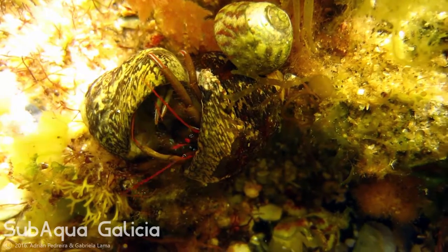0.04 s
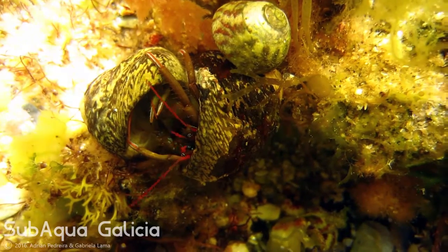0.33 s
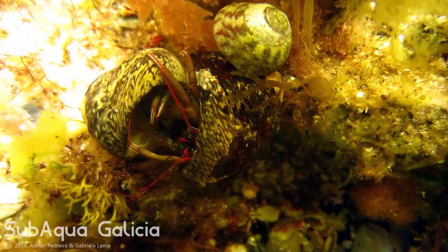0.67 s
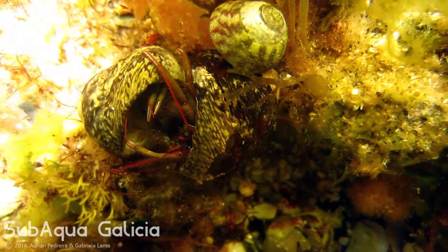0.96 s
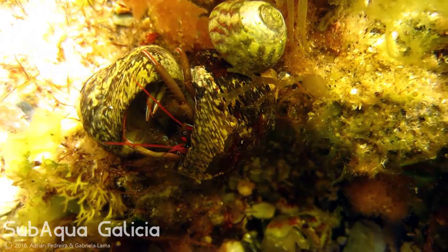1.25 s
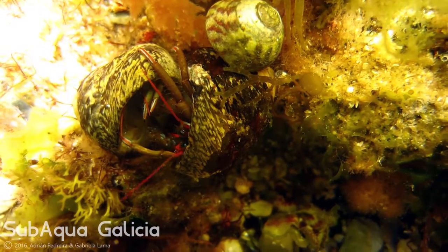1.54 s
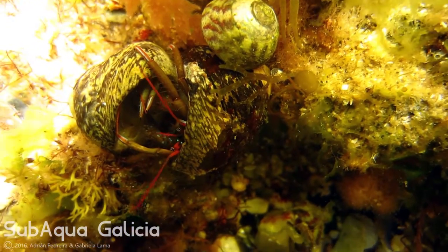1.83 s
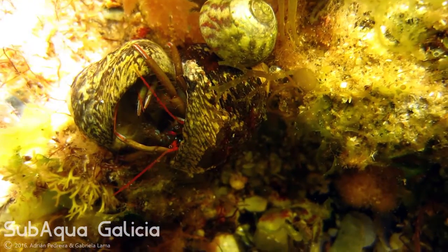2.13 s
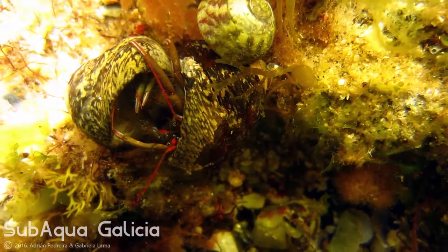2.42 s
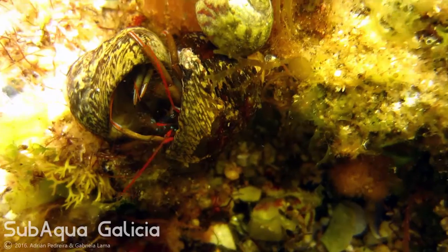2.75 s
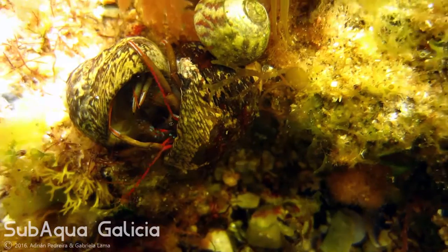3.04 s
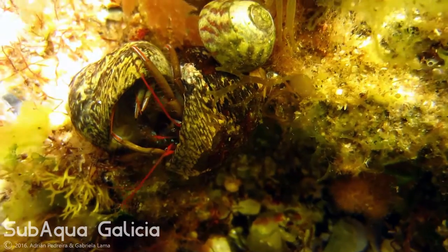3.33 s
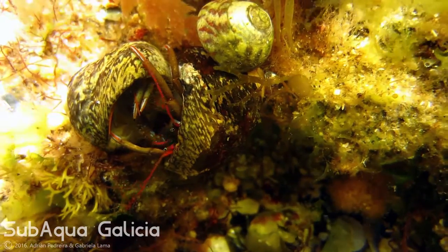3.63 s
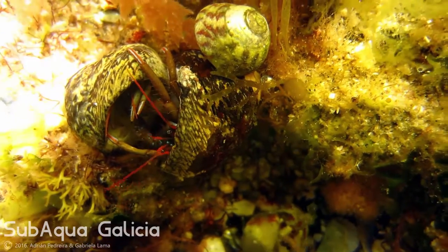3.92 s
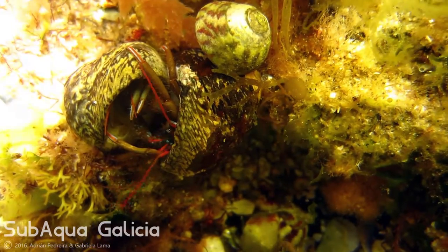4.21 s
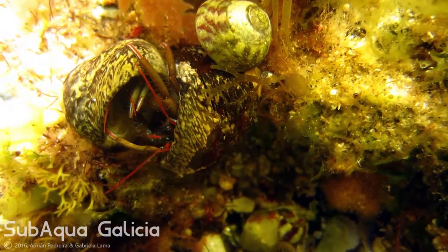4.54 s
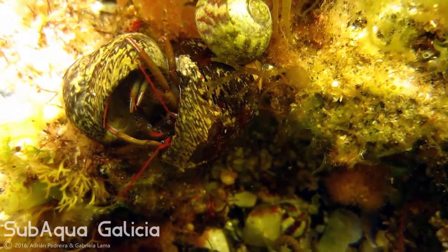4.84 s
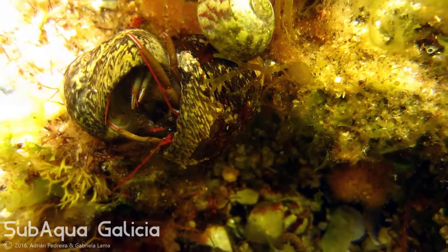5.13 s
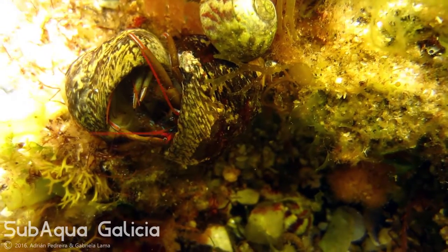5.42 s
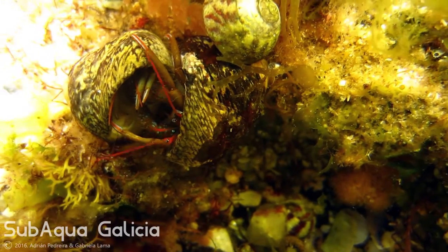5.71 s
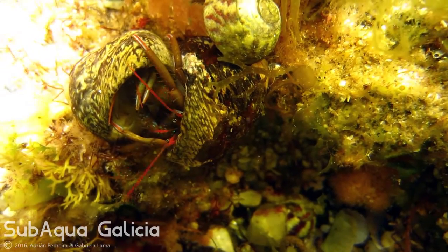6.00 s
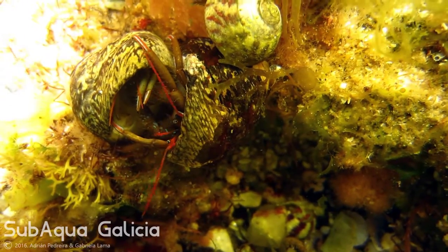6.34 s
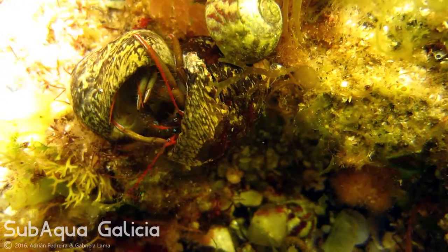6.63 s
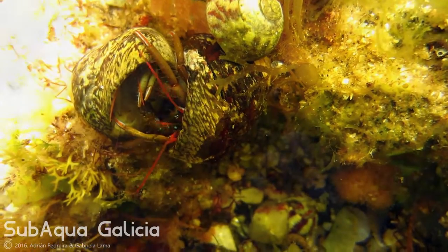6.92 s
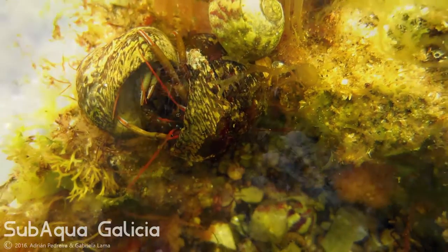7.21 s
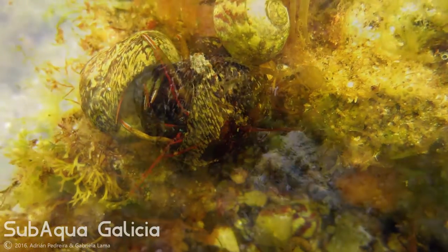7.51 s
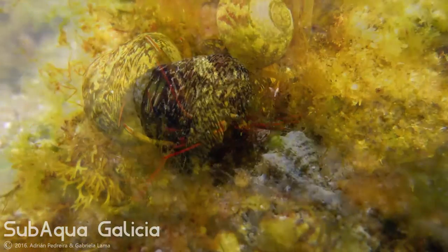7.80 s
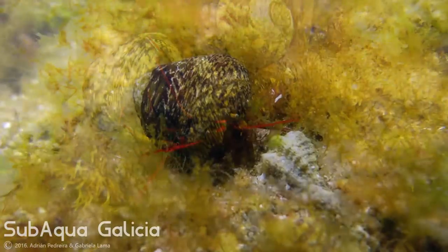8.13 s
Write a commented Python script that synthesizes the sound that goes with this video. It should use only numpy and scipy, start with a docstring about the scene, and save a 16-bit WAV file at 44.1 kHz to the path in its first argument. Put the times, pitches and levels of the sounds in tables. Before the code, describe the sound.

A quiet, hollow hum with a thin wavering whine and a low rumble runs under water, heard from inside a camera housing. Faint dull bumps dot the first two seconds. At about 2.7 seconds a heavy knock hits the housing, the loudest moment, with scratchy rubbing and a scatter of tiny sharp clicks until 3.3 seconds. A short wash of water passes at around 3 seconds. Soft bumps continue, and from 5 to 6 seconds water swells gently with small gurgles, followed by a few light taps. At 7.1 seconds comes a second sharp knock with clicks, then rubbing, a tiny squeak, smaller bumps and more washing. The sound drops out at 7.6 seconds and returns at about 7.75 with a brighter, fizzing wash, a gurgle sinking in pitch and two faint clicks, ending near 8.3 seconds.

```python
"""Underwater camera beside a hermit crab

The camera's noise and thin whine resonate in the air of its watertight housing on the sea floor.
A hand knocks on the wall and rubs it, small clicks ring, and water gurgles and washes past.
Near the end the sound drops out for a moment at a change of shot and returns with a brighter wash."""
import sys
import numpy as np
from scipy import signal
from scipy.fft import rfft, irfft
from scipy.io import wavfile
from scipy.ndimage import uniform_filter1d

SR = 44100
rng = np.random.default_rng(int(sys.argv[2]) if len(sys.argv) > 2 else 0)


def generate_wav(signal):
    """Clip the signal to [-1, 1] and save it as 16-bit WAV at the path in sys.argv[1]."""
    frames = np.transpose(np.atleast_2d(signal))
    scaled = np.clip(frames, -1, 1) * 32767
    pcm = np.round(scaled).astype(np.int16)
    wavfile.write(sys.argv[1], SR, pcm)


N = 364266
TIME_S, BIN_HZ = np.arange(N) / SR, np.fft.rfftfreq(N, 1 / SR)
SHOT_END_S, SHOT_START_S = 7.588, 7.754   # the first shot ends, the second starts

# Small sharp clicks. Each row: start in seconds, level in dB, pitch of the ring in Hz.
CLICKS = [(2.244, -54, 4780), (2.6705, -48, 6000), (2.681, -47, 7000), (2.7422, -40, 2880),
          (2.778, -53, 5500), (2.7895, -58, 6500), (2.797, -47, 4800), (2.805, -54, 5200),
          (2.826, -46, 4600), (2.835, -60, 7050), (2.917, -49.5, 7000), (2.941, -57, 3300),
          (2.992, -53, 5500), (3.111, -53, 5500), (3.198, -56, 3500), (3.204, -55, 5500),
          (3.2634, -52, 7000), (3.284, -55.5, 7000), (3.292, -53, 6000), (3.307, -43.5, 6000),
          (3.333, -40.5, 5800), (7.08, -50, 3460), (7.083, -37.5, 7000), (7.0955, -38.5, 3280),
          (8.125, -50, 4790), (8.2073, -46, 4700)]


def from_db(db):
    """Amplitude grows tenfold with every 20 dB."""
    return 10 ** (np.asarray(db) / 20)


def rms_one(x):
    """Normalisation to an rms of 1."""
    return x / np.sqrt(np.mean(x ** 2) + 1e-20)


def per_bin(points):
    """Interpolation of (Hz, value) points at every bin, along a logarithmic frequency axis."""
    hz, value = np.transpose(points)
    return np.interp(np.log(BIN_HZ + 1e-6), np.log(hz), value)


def panned(pan_db):
    """Level difference, left minus right, as a gain for each microphone."""
    return from_db(np.array([[pan_db], [-pan_db]]) / 2)


def pair(two, correlation):
    """Sum and difference of two independent signals give a left and a right of set correlation."""
    alike = np.clip(correlation, -.98, .98)
    return np.sqrt(1 + alike) * two[0] + np.sqrt(1 - alike) * two[1] * np.array([[1], [-1]])


def drift(rate_hz):
    """Low-passed noise wanders at random; rms 1."""
    return rms_one(irfft(rfft(rng.standard_normal(N)) / (1 + (BIN_HZ / rate_hz) ** 2), N))


def wavering(hz, width_hz):
    """A randomly driven resonance gives narrow-band noise about a steady or moving pitch."""
    phase = 2 * np.pi * np.cumsum(hz * np.ones(N)) / SR
    return drift(width_hz) * np.cos(phase) + drift(width_hz) * np.sin(phase)


def grains(spectrum, per_s, spread_db, correlation):
    """Shot noise: tiny random impulses of uneven size, filtered by their path; rms 1."""
    sizes = from_db(spread_db * np.minimum(rng.exponential(1, (2, N)), 4))
    impulses = (rng.random((2, N)) < per_s / SR) * sizes * rng.choice([-1, 1], (2, N))
    return rms_one(irfft(pair(rfft(impulses), correlation) * from_db(per_bin(spectrum)), N))


def swells(rows, rise_share):
    """Amplitude envelope of movements that speed up and slow down in a cosine arch."""
    envelope = np.zeros(N)
    for peak_s, length_s, level_db in rows:
        side_s = length_s * np.where(TIME_S < peak_s, rise_share, 1 - rise_share)
        envelope += from_db(level_db) * np.cos(np.pi / 2 * np.clip((TIME_S - peak_s) / side_s, -1, 1))
    return envelope


def ring(force, modes):
    """Modal superposition: each mode answers a force as a damped oscillator."""
    out = np.zeros((2, N))
    for hz, level_db, t60, pan_db in modes:
        radius, angle = from_db(-60 / (t60 * SR)), 2 * np.pi * hz / SR
        swing = signal.lfilter([.5, 0, -.5], [1, -2 * radius * np.cos(angle), radius ** 2], force + 1e-18)
        out += from_db(level_db) * panned(pan_db) * swing
    return out


def hum(level_db=-48):
    """Cavity resonance: the air in the housing lifts bands of the camera's steady noise."""
    # Noise spectrum at each microphone. Each row: frequency in Hz, relative level in dB.
    left_spectrum = [(20, -20.5), (45, -12), (130, -0.5), (400, -6.5), (600, -8), (880, -6.5), (1050, -7),
                     (1550, -14.5), (2100, -14.5), (3200, -25.5), (4500, -30), (7000, -32), (10500, -40.5),
                     (12500, -67), (14300, -41.5)]
    right_spectrum = [(20, -16), (45, -6), (130, -1.5), (400, -6.5), (600, -7), (840, -1), (960, -10.5),
                      (1550, -14), (2200, -18), (3200, -23), (4500, -30), (7000, -31.5), (10500, -40.5),
                      (12500, -65.5), (14300, -41.5)]
    # Air resonances. Each row: centre in Hz, width in Hz, left lift in dB, right lift in dB.
    air_modes = [(445, 86, 3.5, 8), (747, 76, 5, 4.5), (1058, 94, 2.5, 4.5), (1244, 205, 15.5, 6),
                 (1750, 110, 3, 7), (1969, 91, 5.5, 14), (2650, 370, 0.5, 4), (3770, 240, 5, 5.5),
                 (4780, 230, 3, 3.5), (5870, 400, 3, 3.5)]
    # Likeness of the two microphones. Each row: frequency in Hz, correlation from -1 to 1.
    correlation = [(40, -0.56), (380, -0.89), (500, 0.17), (600, -0.55), (750, 0.83), (890, 0.48),
                   (970, -0.97), (1060, -0.68), (1150, -0.19), (1215, -.35), (1320, 0.45), (1540, -0.1),
                   (1700, 0.5), (1800, .3), (1960, 0.87), (2420, -0.29), (2650, 0.42), (3450, -0.68),
                   (3780, 0.77), (4100, -0.2), (4600, -0.13), (5300, -0.11), (6500, -0.012)]
    spectrum_db = np.array([per_bin(left_spectrum), per_bin(right_spectrum)])
    for centre, width, left_db, right_db in air_modes:
        spectrum_db += np.array([[left_db], [right_db]]) / (1 + (2 * (BIN_HZ - centre) / width) ** 2)
    noise = pair(rfft(rng.standard_normal((2, N))), per_bin(correlation))
    return from_db(level_db) * rms_one(irfft(noise * from_db(spectrum_db), N))


def whine(wander=0.00344, flutter_db=3.5):
    """Random frequency and amplitude modulation make the camera's thin tones waver."""
    # Tones. Each row: frequency in Hz, left level in dB, right level in dB, polarity of the left.
    partials = [(1895.5, -68.5, -63.5, 1), (3791, -88, -86, 1), (6110, -95, -97, -1), (7870, -92, -90, -1)]
    clock = np.cumsum(1 + wander * drift(33)) / SR
    tones = sum(from_db([[left], [right]]) * [[sign], [1]] * np.sin(2 * np.pi * hz * clock)
                for hz, left, right, sign in partials)
    return np.sqrt(2) * tones * from_db(flutter_db * drift(16))


def rumble(hold_db=-60):
    """Structure-borne sound: the held housing rumbles in the first shot, more as the grip shifts."""
    # Shifts of the grip. Each row: peak time in seconds, length in seconds, level in dB.
    shifts = [(2.75, 0.62, -68), (7.10, 0.076, -39), (7.45, 0.39, -54)]
    # Rumble spectrum. Each row: frequency in Hz, relative level in dB.
    spectrum = [(20, -13), (55, 2.5), (140, 2.5), (300, 1), (550, -0.5), (1200, -55.5)]
    grip = (from_db(hold_db) + swells(shifts, rise_share=.55)) * (TIME_S < SHOT_START_S)
    return grip * grains(spectrum, per_s=450, spread_db=3.5, correlation=.34) * panned(-4.5)


def knocks(grit=.6, grind_s=.003):
    """Impact excitation: soft pushes wake the wall's low modes, light taps favour its high ones."""
    # Contacts; several in quick succession make a heavy knock.
    # Each row: start in seconds, level in dB, hardness as a high cut in Hz, lightness as a low cut in Hz.
    contacts = [(.584, -36, 650, 530), (1.21, -39, 150, 30), (1.54, -42, 150, 30), (1.757, -38, 380, 90),
                (1.831, -34.5, 130, 30), (2.242, -35.5, 600, 390), (2.6655, -38, 2400, 70),
                (2.6705, -30, 2400, 130), (2.6802, -30, 800, 40), (2.6863, -40, 1760, 130),
                (2.6882, -3.5, 270, 10), (2.6926, -8.5, 496, 56), (2.6952, -11.5, 288, 10),
                (2.6975, -6, 420, 370), (2.7893, -24, 1920, 220), (2.796, -28, 700, 80),
                (3.111, -32, 400, 50), (3.612, -37, 150, 30), (3.782, -33, 150, 30), (4.034, -37, 150, 26),
                (4.398, -43, 300, 110), (4.774, -37, 420, 40), (4.830, -36, 130, 20), (5.061, -38, 170, 30),
                (5.1441, -29.5, 900, 680), (6.0121, -28, 755, 330), (6.0683, -35.5, 770, 160),
                (6.175, -28, 775, 270), (6.226, -36, 600, 320), (6.267, -41, 500, 180),
                (6.985, -40, 450, 110), (7.0803, -13.5, 1900, 1700), (7.0836, -12.5, 1000, 48),
                (7.0863, -14.5, 484, 20), (7.0941, -23, 1150, 190), (7.0991, -24, 130, 22),
                (7.283, -46, 900, 400), (7.290, -35.5, 900, 230), (7.377, -35, 850, 490),
                (7.4546, -30, 360, 77), (7.4925, -32.5, 470, 60), (7.582, -39, 700, 85)]
    # Wall modes. Each row: frequency in Hz, level in dB, T60 in seconds, left minus right in dB.
    wall_modes = [(58, -19, .03, -3), (133, -22, .055, -6), (156, -2.5, .038, -6), (195, -11, .03, -6),
                  (305, -8.5, .028, -6), (410, -12, .026, -5), (472, -11, .042, -6), (618, -3.5, .034, -6),
                  (785, -12, .034, -4), (1230, 0, .014, 4), (1525, -9.5, .018, -1), (1700, -12, .016, -1),
                  (2030, -.5, .015, -1), (2950, -25, .015, -6), (4789, -33, .01, -4), (7013, -34, .012, -3)]
    taps = [(s, level_db + 1.5, 1870, 300) for s, level_db, _ in CLICKS]   # each click taps the wall too
    force, t = np.zeros((2, N)), np.arange(N // 200) / SR
    for s, level_db, hard_hz, low_hz in list(contacts) + taps:
        # the surfaces grind briefly after they meet, differently at each microphone
        grind = signal.lfilter([1, -1], [1, -.82], rng.standard_normal((2, len(t))))
        grind *= np.exp(-t / grind_s)
        contact = (t == 0) + grit * grind / np.linalg.norm(grind, axis=1, keepdims=True)
        push = t * np.exp(-2 * np.pi * hard_hz * t)
        push = signal.lfilter(*signal.butter(1, low_hz, "high", fs=SR), push / push.sum())
        at = round(s * SR)
        force[:, at:at + len(t)] -= from_db(level_db) * signal.fftconvolve(contact, push[None])[:, :len(t)]
    # the stiff wall passes neither the deepest nor the highest sound
    wall_band = signal.butter(2, (45, 6000), "band", fs=SR, output="sos")
    return signal.sosfilt(wall_band, ring(force, wall_modes) + 1e-18)


def clicks(crack_s=.0015, crack_db=-6, focus_db_per_octave=8):
    """Free vibration: a dry crack sets small hard parts ringing, most near the click's own pitch."""
    # Modes of the parts. Each row: frequency in Hz, relative level in dB, T60 in seconds.
    modes = [(2880, 2, .014), (3800, -8, .008), (4780, -3, .012), (5800, -8, .007), (6800, -4, .010),
             (7150, -5, .008)]
    out, t = np.zeros((2, N)), np.arange(N // 250) / SR
    band = signal.butter(6, (1000, 7600), "band", fs=SR, output="sos")
    for s, level_db, pitch_hz in CLICKS:
        crack = from_db(crack_db) * rng.standard_normal((2, len(t))) * np.exp(-t / crack_s)
        click = signal.lfilter(*signal.butter(2, pitch_hz, fs=SR), crack)
        for hz, mode_db, t60 in modes:
            weight_db = mode_db - focus_db_per_octave * abs(np.log2(hz / pitch_hz))
            phase = rng.uniform(0, np.pi, (2, 1))
            click += from_db(weight_db - 60 * t / t60) * np.sin(2 * np.pi * hz * t + phase)
        at = round(s * SR)
        out[:, at:at + len(t)] += from_db(level_db) * signal.sosfilt(band, click)
    return out * panned(-3.5)


def rubbing(rise_share=.63):
    """Stick-slip friction: skin crosses the housing in tiny jerks, with a dry scratching above."""
    # Hand strokes. Each row: peak time in seconds, length in seconds, rub in dB, scratch in dB.
    strokes = [(2.65, 0.016, -41, -53.5), (2.678, 0.041, -31.5, -50.5), (2.792, 0.064, -34.5, -55),
               (2.83, 0.034, -39, -54.5), (3.06, 0.41, -55.5, -70), (3.296, 0.1, -52, -67),
               (7.087, 0.069, -42, -68), (7.194, 0.13, -44, -63.5), (7.31, 0.037, -47, -76),
               (7.59, 0.22, -51, -68)]
    # Friction spectra. Each row: frequency in Hz, relative level in dB.
    rub_spectrum = [(40, 4), (150, 7), (700, 8.5), (1400, 0), (2200, -2.5), (3500, -14), (5000, -31),
                    (7300, -35), (10000, -54.5), (15000, -59)]
    scratch_spectrum = [(1500, -21), (2900, 5), (4000, -4), (4800, -4.5), (5700, -7.5), (7000, -8),
                        (8200, -14), (11000, -37)]
    peak_s, length_s, rub_db, scratch_db = np.transpose(strokes)
    rub = grains(rub_spectrum, per_s=7900, spread_db=1.5, correlation=.98)
    rub *= swells(zip(peak_s, length_s, rub_db), rise_share)
    scratch = grains(scratch_spectrum, per_s=1800, spread_db=2.5, correlation=.1)
    scratch *= swells(zip(peak_s, length_s, scratch_db), rise_share)
    return rub * panned(-3.5) + scratch * panned(-9)


def glugs():
    """A narrow resonance in the passing water gurgles briefly, sliding from one pitch to the next."""
    # Gurgles. Each row: peak time in seconds, length in seconds, level in dB, pitch in Hz.
    gurgles = [(2.991, 0.052, -49, 560), (5.281, 0.067, -51, 514), (5.418, 0.044, -50.5, 640),
               (5.475, .05, -51.5, 466), (5.518, 0.083, -50, 562.6), (5.628, 0.018, -42.5, 516),
               (5.662, 0.022, -47, 560)]
    peak_s, length_s, level_db, hz = np.transpose(gurgles)
    envelope = swells(zip(peak_s, length_s, level_db), rise_share=.35)
    return envelope * wavering(np.interp(TIME_S, peak_s, hz), width_hz=120) * panned(-9.5)


def wash():
    """Flow noise: each wave passing the housing comes faster than it ebbs."""
    # Waves. Each row: peak time in seconds, length in seconds, level in dB.
    waves = [(3.07, 0.25, -42.5), (3.32, 0.19, -54), (5.45, 1.32, -51), (7.29, 0.2, -50),
             (7.58, 0.12, -48.5)]
    # Flow spectrum. Each row: frequency in Hz, relative level in dB.
    spectrum = [(40, -3), (160, -4.5), (300, -17), (430, 5.5), (720, 1), (1000, -5), (1400, -6),
                (2000, -16.5), (2800, -14), (4000, -57), (9000, -62)]
    flow = grains(spectrum, per_s=1100, spread_db=-.5, correlation=.73)
    return swells(waves, rise_share=.35) * flow * panned(-3.5)


def squeak(peak_s=7.158, length_s=.05, level_db=-49):
    """Friction-driven vibration: sliding skin sings briefly in a narrow band."""
    return swells([(peak_s, length_s, level_db)], rise_share=.63) * wavering(1580, width_hz=90)


def surge(gurgle_db=.5):
    """Flow noise in the second shot: the water fizzes and its gurgle sinks in pitch."""
    # Course of the surge. Each row: time in seconds, flow in dB, fizz in dB, gurgle pitch in Hz.
    course = [(7.753, -56.5, -64, 1411), (7.849, -54, -54.5, 1583), (7.949, -57, -50, 1393),
              (8.03, -52.5, -55.5, 998.5), (8.129, -52, -61, 889), (8.26, -57.5, -65, 840)]
    # Spectra of the water and its hiss. Each row: frequency in Hz, relative level in dB.
    flow_spectrum = [(40, 2.5), (200, -14.5), (330, 0), (500, 5), (850, 9.5), (1150, 7.5), (1700, 5),
                     (2600, -6), (4000, -30), (9000, -55)]
    fizz_spectrum = [(60, -1), (200, 2.5), (600, 2.5), (1600, -1.5), (2400, 0.5), (3350, -11), (3800, -4.5),
                     (4250, -14), (4850, -6), (5350, -16), (5800, -9), (7000, -14), (9500, -17),
                     (12000, -58)]
    s, flow_db, fizz_db, gurgle_hz = np.transpose(course)
    gurgle = from_db(gurgle_db) * wavering(np.interp(TIME_S, s, gurgle_hz), width_hz=310)
    flow = grains(flow_spectrum, per_s=4100, spread_db=-4, correlation=.46) + gurgle
    fizz = grains(fizz_spectrum, per_s=10000, spread_db=3, correlation=.63)
    flow *= from_db(np.interp(TIME_S, s, flow_db, left=-120, right=-120))
    fizz *= from_db(np.interp(TIME_S, s, fizz_db, left=-120, right=-120))
    return (flow + fizz) * panned(-5)


def from_the_right(x, lag_s=.00006):
    """Path difference: sound from the right reaches the left microphone a moment later."""
    delay = np.exp(-2j * np.pi * BIN_HZ * lag_s)
    return np.array([irfft(rfft(x[0]) * delay, N), x[1]])


def scene():
    """Superposition of all sources over the hum and whine, which are weaker in the second shot."""
    bed = from_db(np.where(TIME_S < SHOT_START_S, 0, -2.5)) * (hum() + whine())
    clicking = clicks()
    handling = knocks() + rubbing() + rumble() + squeak()
    water = wash() + surge() + glugs()
    return bed + clicking + from_the_right(handling + water)


def record(dry, cutoff_hz=15700):
    """Gating silences the gap between the shots; a steep low-pass limits the bandwidth."""
    running = (TIME_S < SHOT_END_S) | (TIME_S > SHOT_START_S)
    gate = uniform_filter1d(running.astype(float), size=40)
    return signal.sosfilt(signal.ellip(10, .1, 80, cutoff_hz, fs=SR, output="sos"), dry * gate)


dry = scene()
out = record(dry)
generate_wav(out)
```